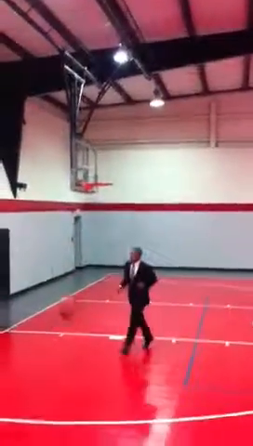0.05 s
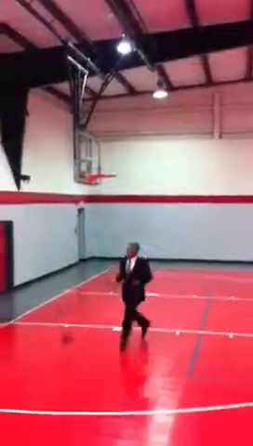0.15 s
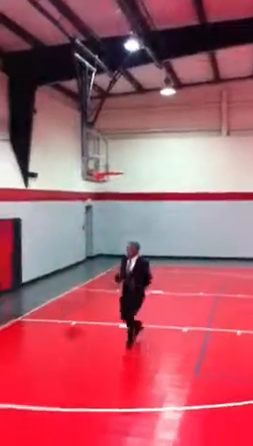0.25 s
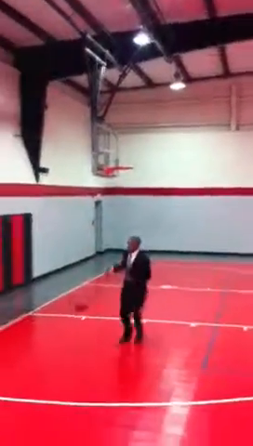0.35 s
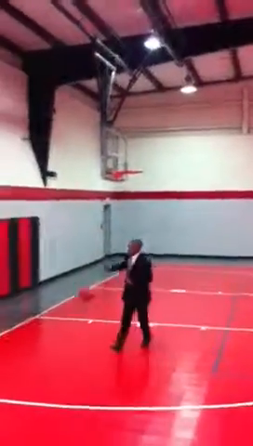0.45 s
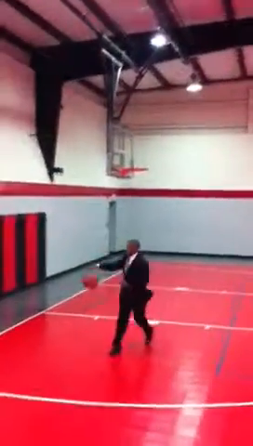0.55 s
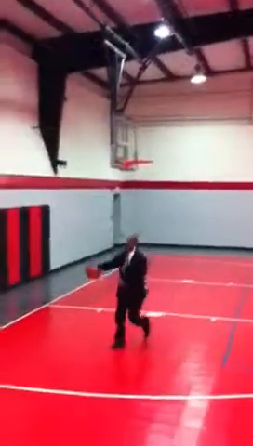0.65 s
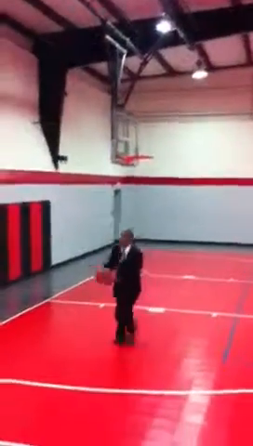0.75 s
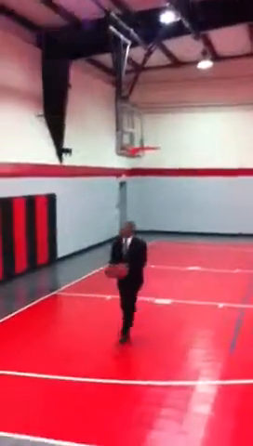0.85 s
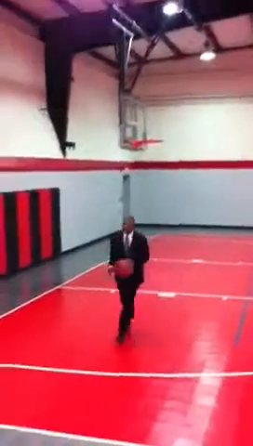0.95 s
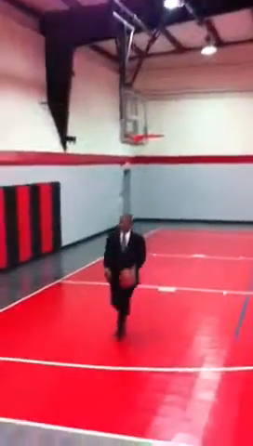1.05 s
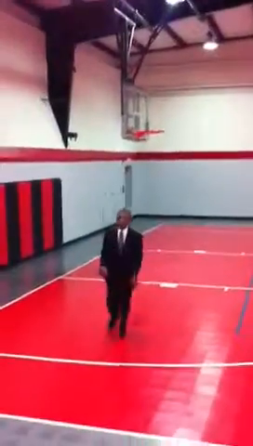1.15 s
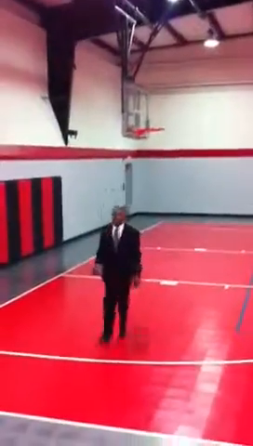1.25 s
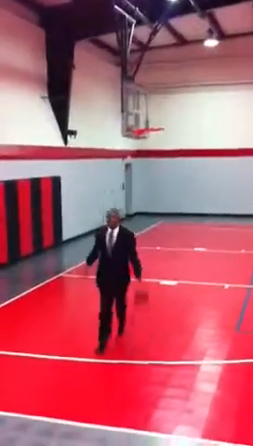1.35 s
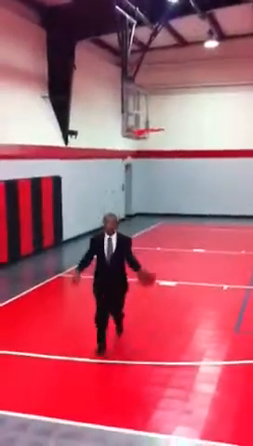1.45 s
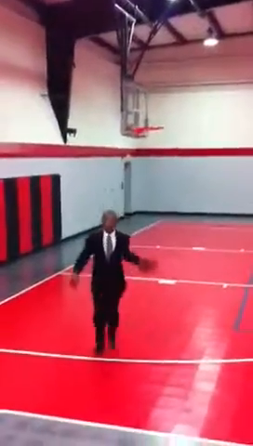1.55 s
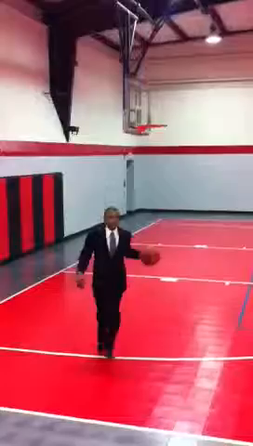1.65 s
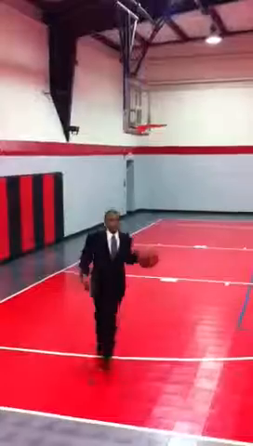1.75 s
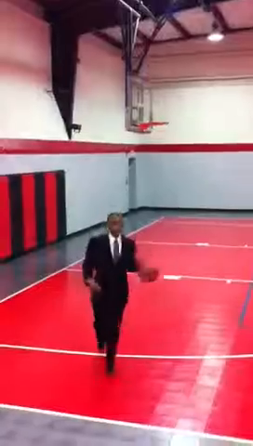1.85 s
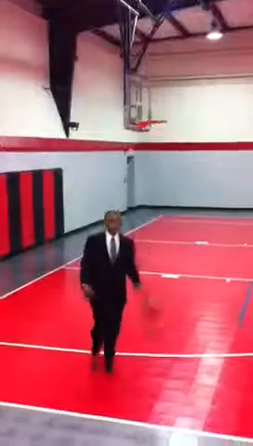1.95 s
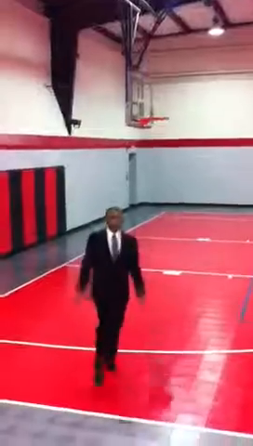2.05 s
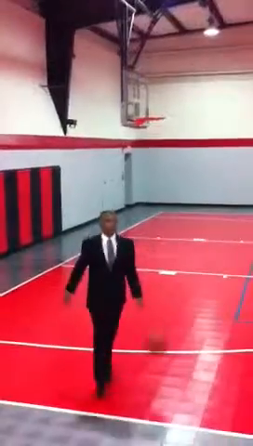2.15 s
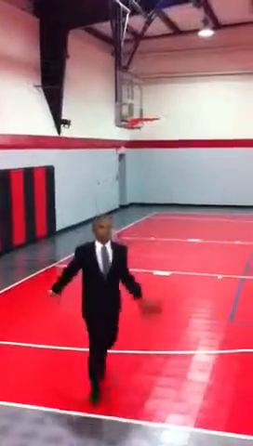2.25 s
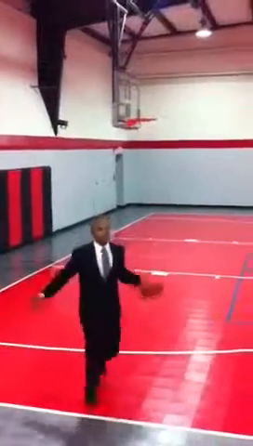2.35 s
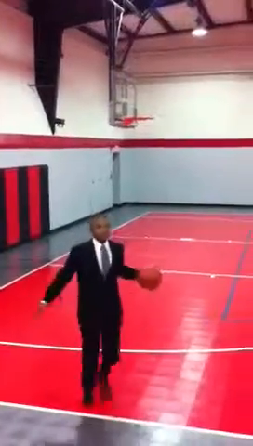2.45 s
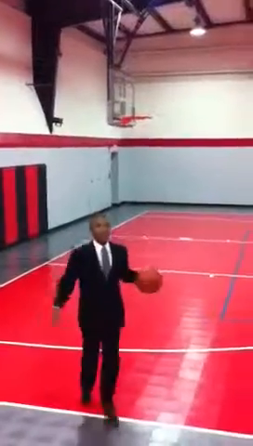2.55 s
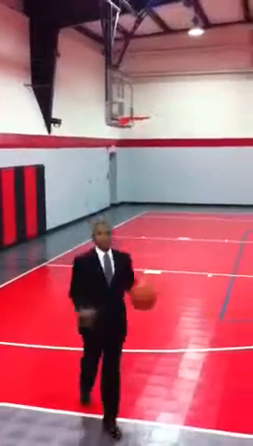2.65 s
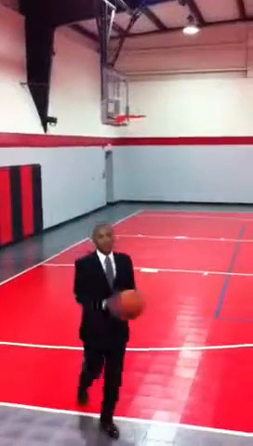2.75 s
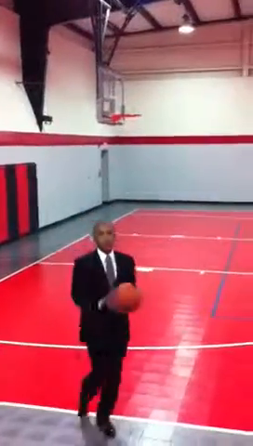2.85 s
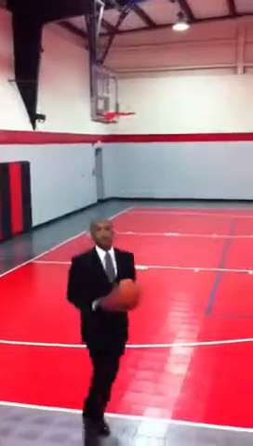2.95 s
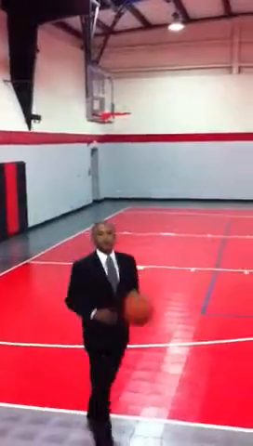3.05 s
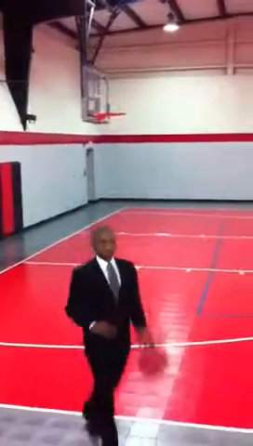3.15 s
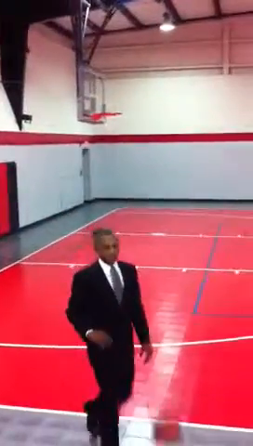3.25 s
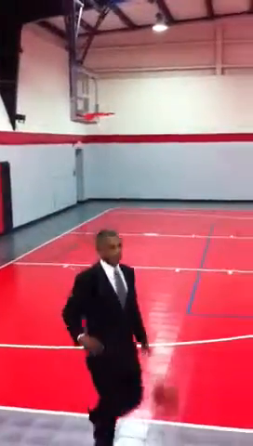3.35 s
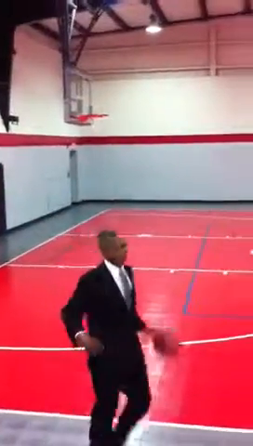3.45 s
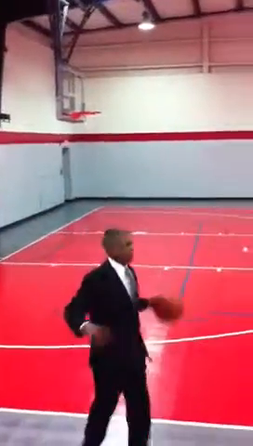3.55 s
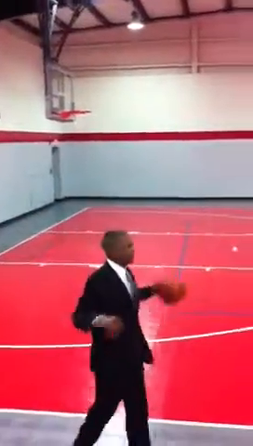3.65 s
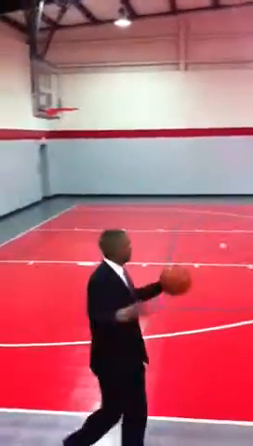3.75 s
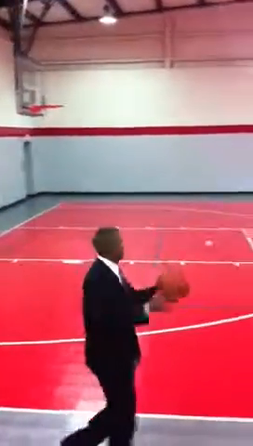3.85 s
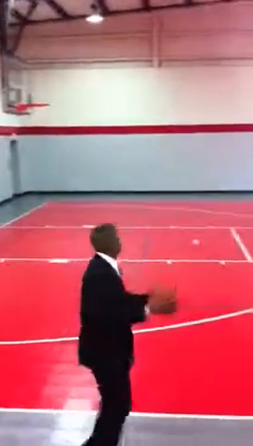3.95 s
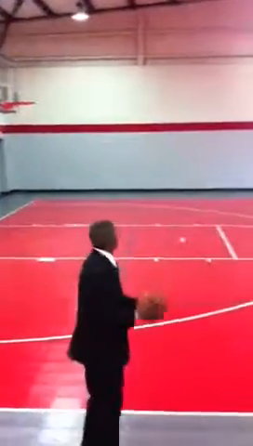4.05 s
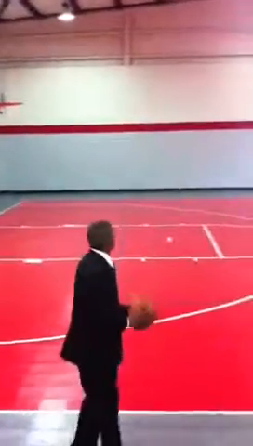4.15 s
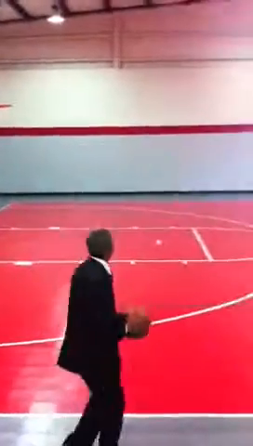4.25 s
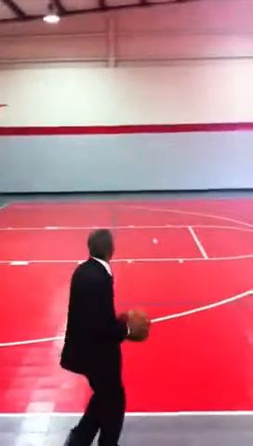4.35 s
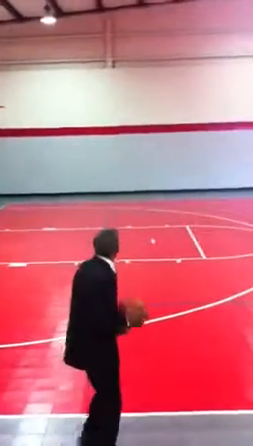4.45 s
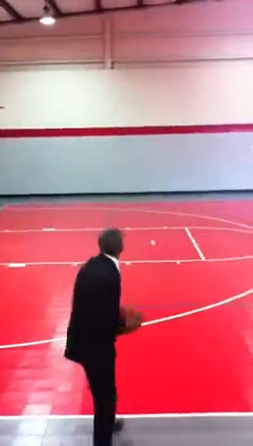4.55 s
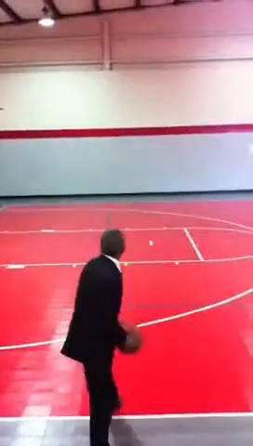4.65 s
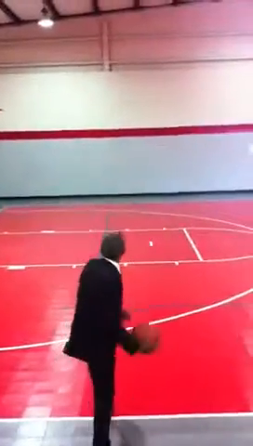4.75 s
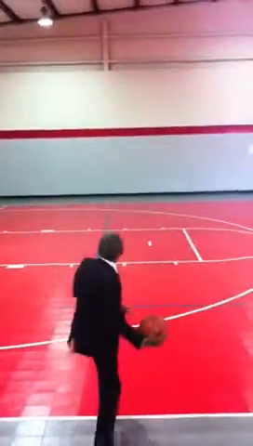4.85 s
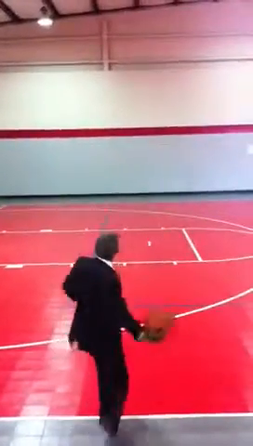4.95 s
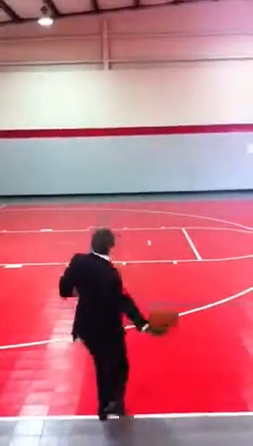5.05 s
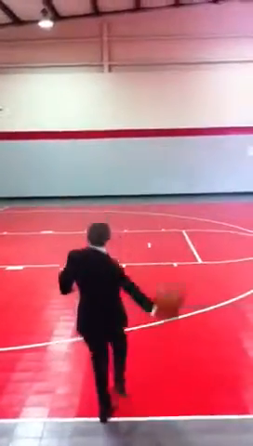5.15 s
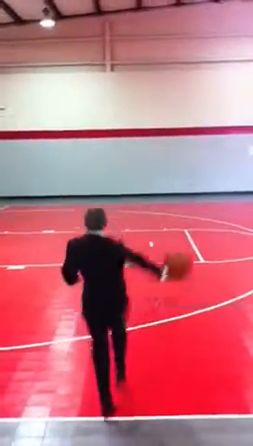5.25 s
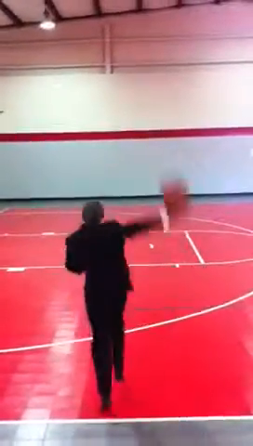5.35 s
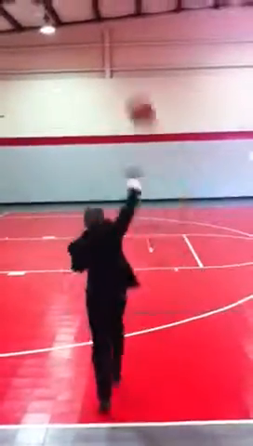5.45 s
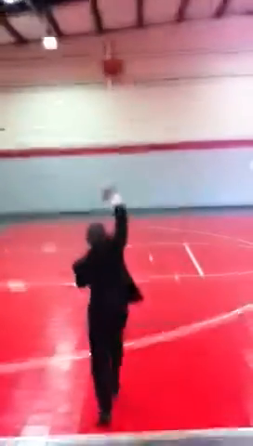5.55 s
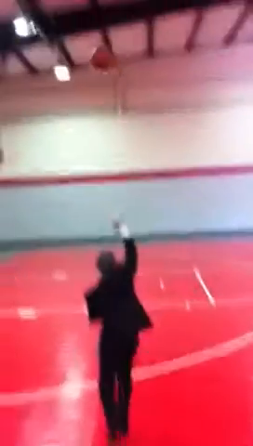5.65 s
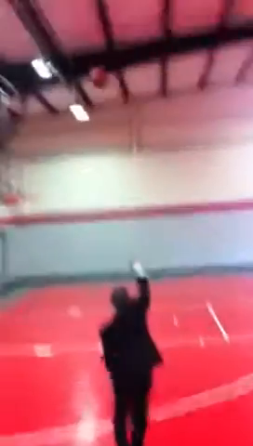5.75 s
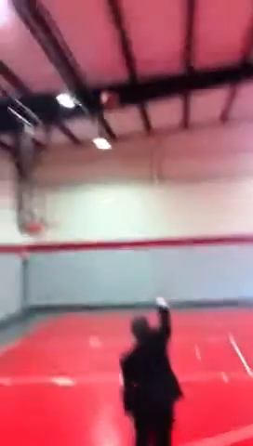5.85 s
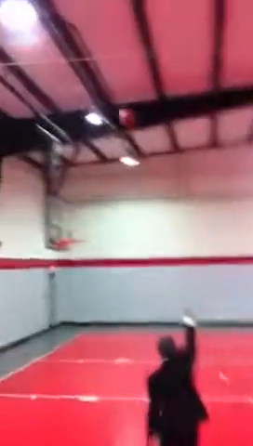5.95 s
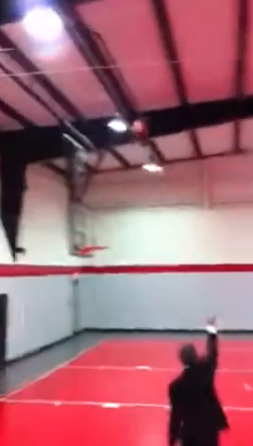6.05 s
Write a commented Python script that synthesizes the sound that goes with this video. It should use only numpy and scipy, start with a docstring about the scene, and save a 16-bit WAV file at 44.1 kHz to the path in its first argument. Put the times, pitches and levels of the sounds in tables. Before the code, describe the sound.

A faint ventilation hum and microphone hiss run throughout in a large, echoing gym. A basketball bounces on the tiled floor at about 0.4 seconds, some way off and a little quieter than what follows. It bounces again at 1.4, 2.3, 2.9, 3.5 and 4.1 seconds, coming nearer each time, the strongest at 2.9. Each bounce is a sharp slap with a short hollow ring and a thump from the floor; those at 2.9 and 4.1 are duller, with more knock from the tiles. The walls and roof throw each one back, and it fades over a second or so. Soft footsteps and light knocks of hands on the ball fall between the bounces, much quieter. After 4.1 seconds the dribbling stops, leaving a step at 4.3, faint touches around 4.8 and 5.0, another step at 5.7 and a last small knock near 6 seconds.

```python
"""In a large, echoing gym, a basketball is dribbled six times on the tiled sports floor.
With each bounce the ball's skin slaps, the air inside rings, the tiles knock and the floor thumps.
Shoes and hands knock softly in between. The walls and roof throw these sounds back.
Ventilation hums all the while, under a faint microphone hiss."""
import sys
import numpy as np
from scipy import signal
from scipy.fft import rfft, irfft
from scipy.io import wavfile

SR = 44100
rng = np.random.default_rng(int(sys.argv[2]) if len(sys.argv) > 2 else 0)


def output_pcm(signal):
    """Save a mono or channel-first signal as 16-bit PCM at the path in sys.argv[1].

    Samples are clipped to [-1, 1] before scaling.
    """
    pcm = np.clip(np.atleast_2d(signal).T, -1, 1) * 32767
    wavfile.write(sys.argv[1], SR, np.round(pcm).astype(np.int16))


N = 269406
TIME = np.arange(N) / SR
SPAN = TIME[:int(1.6 * SR)]   # the clock for one short sound and its fading

# Levels are relative. A fade time (t60) is how long a sound takes to drop by 60 dB.
# Ventilation rumble and microphone hiss. Each row: frequency in Hz, level in dB.
NOISE_SHAPE = [(25, -17), (45, -36), (65, -43), (90, -41), (125, -45.5), (190, -44), (290, -42.5),
               (420, -54), (700, -56), (1500, -61), (3000, -64), (7000, -66.5), (10500, -70), (15000, -68)]
# Ventilation tones. Each row: pitch in Hz, level in dB.
HUM_TONES = [(119.8, -58.5), (293, -61)]
# Footsteps. Each row: start in seconds, heel knock in dB, seconds until the sole lands,
# sole knock in dB, heel tap in dB, sole tap in dB.
FOOTSTEPS = [ (0.295, -34, 0.051, -32, -37, -44), (1.111, -37, 0.063, -38, -51, -43.5),
             (1.930, -39.5, 0.052, -38, -44, -38.5), (3.289, -29.5, 0.065, -38, -39, -45),
             (3.737, -35, .071, -40.5, -40.5, -40), (4.312, -33, .045, -31, -42, -45),
             (5.654, -32, 0.054, -31, -36.5, -44.5)]
# Hands on the ball and single touches of a shoe. Each row: start in seconds, knock level in dB,
# knock pitch in Hz, tap level in dB.
TOUCHES = [ (0.3472, -34, 664, -52), (0.725, -39.5, 386, -32), (0.856, -38, 423, -42.5),
           (0.954, -31, 436, -32), (2.735, -41.5, 413, -46), (2.838, -38, 417, -30),
           (4.194, -39.5, 595, -46), (4.805, -41, 410, -48), (5.045, -44.5, 393, -59),
           (6.040, -43.5, 408, -54)]
# Bounces. Each row: start in seconds, distance in metres, strength in dB, firmness of the spot (0 to 1),
# floor thump in Hz, pitch in Hz where the ball's ring is boosted, that boost in dB.
DRIBBLES = [ (0.3974, 7.8, -4.5, 0.13, 127, 1600, 11.5), (1.4049, 6.05, 0, 0.32, 137.5, 880, 16.5),
            (2.2611, 4.97, 0.5, 0.1, 117, 836, 2.5), (2.9074, 4.12, 4.5, 0.81, 185, 885, 8),
            (3.4620, 3.2, 1.5, 0.11, 133.4, 1252, 13), (4.0867, 2.27, 0, 0.9, 156, 1080, 6)]
# Tones of the ball's air and shell. Each row: pitch in Hz, level in dB, fade time in seconds.
BALL_TONES = [(673, -34.5, 0.027), (811, -31.5, 0.024), (931, -34.5, 0.02), (1086, -38.5, 0.04),
              (1184, -35, 0.027), (1435, -41, 0.011), (1550, -41.5, 0.035), (2387, -56, 0.023),
              (2788, -45, 0.019), (3226, -44, 0.0095)]
# Tones of the tiles. Each row: multiple of the main pitch, level in dB, loose-spot fade time in seconds.
TILE_TONES = [(.76, -17.5, 0.12), (1.001, 4.5, 0.028), (1.5, -6.5, 0.033), (2.1, -14, 0.024)]
# Tones of the bending floor. Each row: multiple of the thump pitch, level in dB, fade time in seconds.
FLOOR_TONES = [(1.002, -2.5, 0.11), (1.216, -11, 0.15), (1.6, -5.5, 0.064)]
# The gym's wash of reflections. Each row: frequency in Hz, early level in dB, tail level in dB,
# tail fade time in seconds.
HALL_BANDS = [(68.5, -11.5, -28, 2.3), (142.3, -2.5, 2.5, 1), (288, -4, -14, 1.75), (536, -3.5, -3.5, 0.57),
              (920, 0, -6.5, 1.38), (1350, -2, -2.5, 1.21), (2320, -11.5, -6.5, 1.08), (6200, -7, -2, 1.4)]
# Echoes from walls and roof. Each row: path in metres, level in dB, frequency in Hz above which it dulls.
WALL_ECHOES = [(12.11, -11.5, 4700), (17.29, -10, 2100), (40.1, -24, 360), (47.04, -15.5, 640),
               (78.2, -19, 140)]


def from_db(db):
    """Turn decibels into a number to multiply by."""
    return 10 ** (np.asarray(db) / 20)


def at_hz(table, hz):
    """Read a table between its rows, with octaves evenly spaced."""
    points, *columns = np.transpose(table)
    return [np.interp(np.log(hz), np.log(points), column) for column in columns]


def cut(x, hz, kind, order=2):
    """Keep the lows, the highs or a band; a higher order cuts more steeply."""
    sections = signal.butter(order, np.clip(hz, 10, .45 * SR), kind, fs=SR, output="sos")
    return signal.sosfilt(sections, x + 1e-18)


def add(out, start_s, x):
    """Mix x into out from the given time."""
    start = round(start_s * SR)
    out[start:start + len(x)] += x[:len(out) - start]


def ring(hz, db, t60):
    """One fading tone of something struck."""
    return from_db(db - 60 * SPAN / t60) * np.sin(2 * np.pi * hz * SPAN)


def drift(rate):
    """Wander at random, heading for a new value `rate` times a second."""
    values = rng.standard_normal(int(rate * TIME[-1]) + 2)
    return np.interp(TIME * rate, np.arange(len(values)), values)


def swell(rise_s, t60):
    """A loudness curve that builds up and dies away, with a total energy of 1."""
    shape = (1 - np.exp(-SPAN / rise_s)) * from_db(-60 * SPAN / t60)
    return shape / np.linalg.norm(shape)


def ventilation():
    """Steady rumble and hiss, with two slightly wavering tones."""
    hz = np.fft.rfftfreq(N, 1 / SR) + 1
    air = irfft(rfft(rng.standard_normal(N)) * from_db(at_hz(NOISE_SHAPE, hz)[0]), N)
    hum = 0
    for pitch, db in HUM_TONES:
        loudness = from_db(db + 1.05 * drift(rate=2.75))
        hum += loudness * np.sin(2 * np.pi * pitch * TIME + 0.93 * drift(rate=2.585))
    return air + hum


def knock(knock_db, tap_db, hz, t60):
    """A dull knock that swells over half a cycle and soon dies, with a soft tap on top."""
    body = ring(hz, knock_db, t60) * (1 - np.exp(-2 * SPAN * hz))
    clack = ring(hz=815, db=tap_db - 6, t60=0.01)
    scuff = rng.standard_normal(len(SPAN)) * from_db(tap_db - 60 * SPAN / 0.037)
    tap = cut(scuff + clack, 520, "high")
    return body + cut(tap, 1250, "low", order=4)


def player():
    """Each step lands on the heel and rolls onto the sole; hands and shoes knock lightly in between."""
    out = np.zeros(N)
    for start, heel_db, roll_s, sole_db, heel_tap_db, sole_tap_db in FOOTSTEPS:
        add(out, start, knock(heel_db, heel_tap_db, hz=375, t60=0.019))
        add(out, start + roll_s, knock(sole_db, sole_tap_db, hz=362, t60=0.019))
    for start, knock_db, hz, tap_db in TOUCHES:
        add(out, start, knock(knock_db, tap_db, hz, t60=0.033))
    return out


def skin_slap(firmness, slap_db=-5.5):
    """The pebbled skin slaps, duller on a firm spot, and crackles faintly as it flattens."""
    top_hz = 2450 * 2 ** (-0.61 * firmness)
    click = cut(signal.unit_impulse(len(SPAN)), top_hz, "low", order=6)
    slap = -from_db(slap_db) * cut(click, 300, "high", order=1)
    crackle = from_db(-37 - 60 * SPAN / 0.061) * cut(rng.standard_normal(len(SPAN)), 1820, "low")
    return slap + crackle


def ball_ring(firmness, boost_hz, boost_db):
    """The ball's air and shell ring; the part that lands favours some tones. A firm spot dulls them."""
    tones = 0
    for k, (hz, db, t60) in enumerate(BALL_TONES):
        favour_db = boost_db * np.exp(-(np.log(hz / boost_hz) / 0.044) ** 2)
        tones += ring(hz, db + 0.64 + favour_db, t60) * (-1) ** k   # every other tone is flipped
    top_hz = 3850 * 2 ** (-1.22 * firmness)
    return cut(tones, top_hz, "low", order=4)


def floor_thump(firmness, thump_hz):
    """A loose spot thumps deeply; on a firm one the tiles knock louder, lower and longer."""
    tile_hz = 362.6 * 2 ** (-0.47 * firmness)
    tile_db, thump_db = -31.5 + 8.5 * firmness, -19 - 19 * firmness
    longer = 1 + 0.62 * firmness
    tiles = sum(ring(multiple * tile_hz, db + tile_db, t60 * longer) for multiple, db, t60 in TILE_TONES)
    thump = sum(ring(multiple * thump_hz, db + thump_db, t60) for multiple, db, t60 in FLOOR_TONES)
    return cut(tiles + thump, 580, "low", order=1)


def bounce(strength_db, firmness, thump_hz, boost_hz, boost_db):
    """The ball slaps and rings; the floor answers once the ball has flattened."""
    out = skin_slap(firmness) + ball_ring(firmness, boost_hz, boost_db)
    add(out, .0008, floor_thump(firmness, thump_hz))
    return from_db(strength_db) * out


def hall(x, distance, metres_per_second=343):
    """Sound arrives directly, then as early reflections, separate echoes and a long tail."""
    wash = np.zeros(len(SPAN))
    noise = rng.standard_normal((2, len(SPAN)))
    edges_hz = 50 * 2 ** (np.arange(16) / 2)   # half an octave apart
    early = swell(rise_s=0.0015, t60=0.18)
    for k, (low, high) in enumerate(zip(edges_hz, edges_hz[1:])):
        early_db, tail_db, t60 = at_hz(HALL_BANDS, np.sqrt(low * high))
        tail = swell(rise_s=.07, t60=t60)
        loudness = np.hypot(from_db(early_db) * early, from_db(tail_db) * tail)
        band = cut(noise[k % 2] * loudness, [low, high], "band")
        share = np.sqrt(2 * (high - low) / SR)   # a wider band carries more energy
        wash += band / np.linalg.norm(band) * np.linalg.norm(loudness) * share
    # the nearer the source, the more its direct sound stands out
    out = x + (distance / 4.0) ** 0.4 * signal.fftconvolve(x, wash)[:len(x)]
    # beams and pads on the walls smear all but the bass of an echo
    smear = cut(rng.standard_normal(len(SPAN)) * swell(rise_s=0.001, t60=0.043), 420, "high")
    reflected = x + 0.72 * signal.fftconvolve(x, smear)[:len(x)]
    for path, db, dull_hz in WALL_ECHOES:
        delay_s = (path - distance) / metres_per_second
        add(out, delay_s, from_db(db) * cut(reflected, dull_hz, "low", order=1))
    return out


def scene():
    """Bounces, steps and knocks sound in the gym over the ventilation."""
    out = ventilation()
    for start, distance, *impact in DRIBBLES:
        add(out, start, hall(bounce(*impact), distance))
    knocks = player()
    hall_share = 0.66   # the small knocks stir the hall less than the ball does
    return (out + (1 - hall_share) * knocks + hall_share * hall(knocks, distance=7.2))[None]


def record(dry):
    """A small microphone loses the deep bass; the highest treble is cut too."""
    thin = cut(dry, 122.5, "high", order=3)
    treble_cut = signal.ellip(10, .1, 70, 15850, fs=SR, output="sos")
    return signal.sosfilt(treble_cut, thin)


dry = scene()
out = record(dry)
output_pcm(out)
```